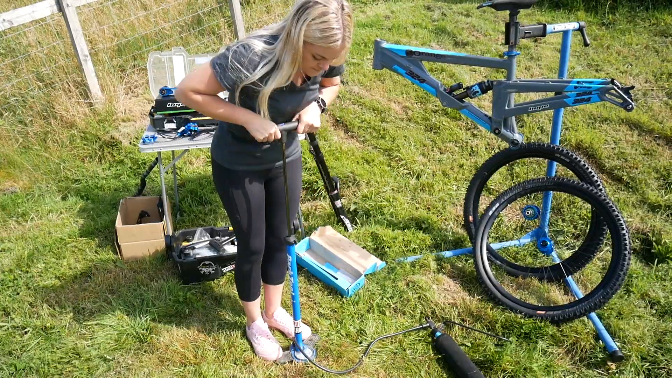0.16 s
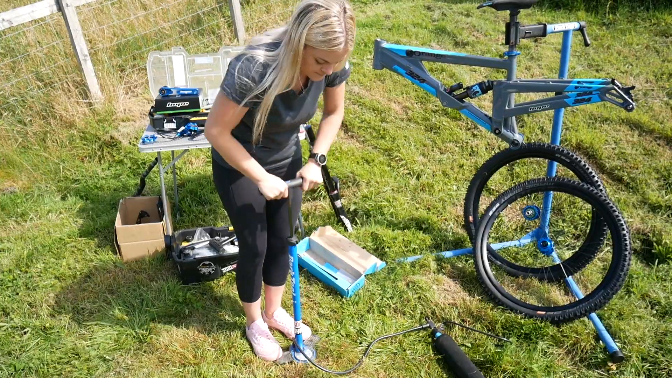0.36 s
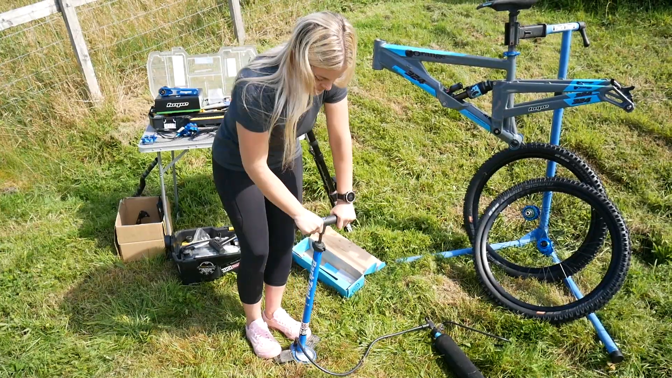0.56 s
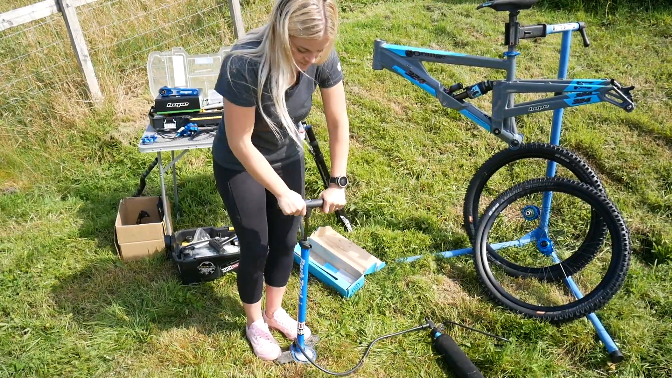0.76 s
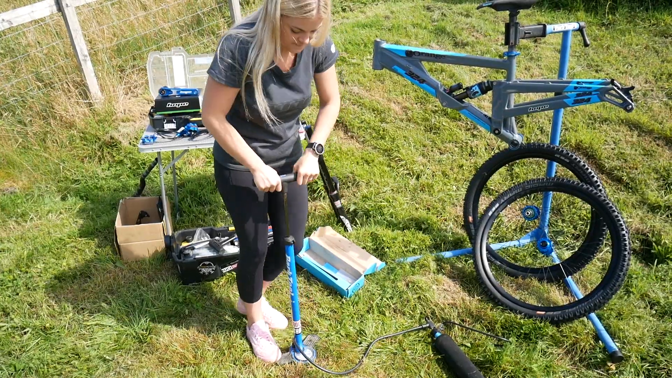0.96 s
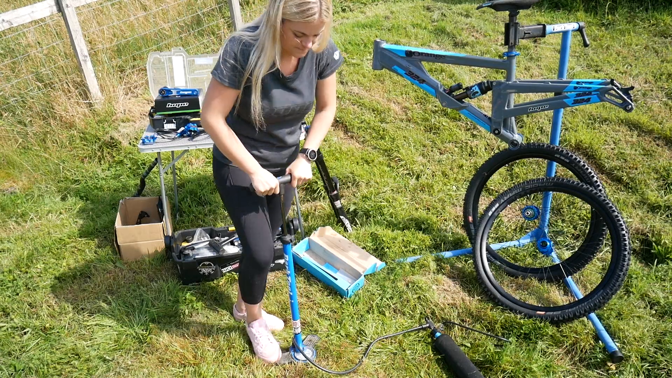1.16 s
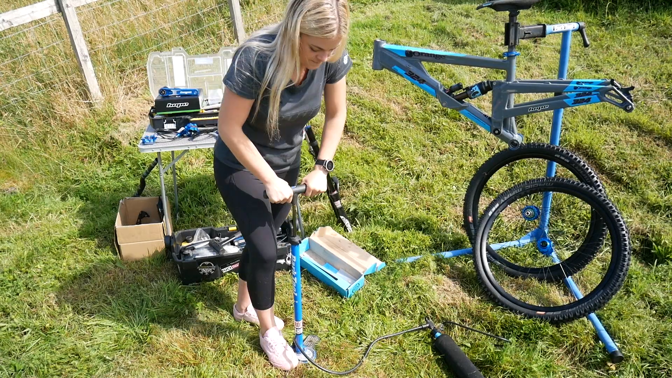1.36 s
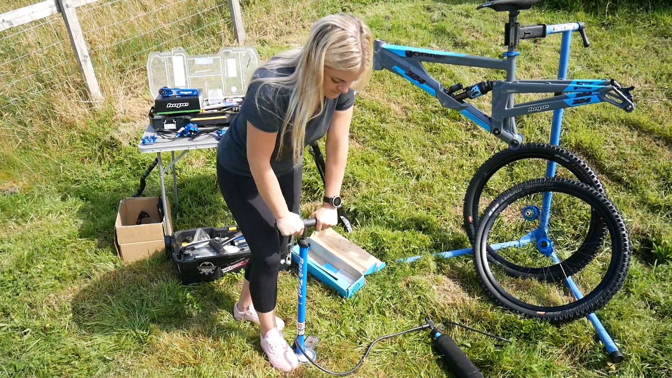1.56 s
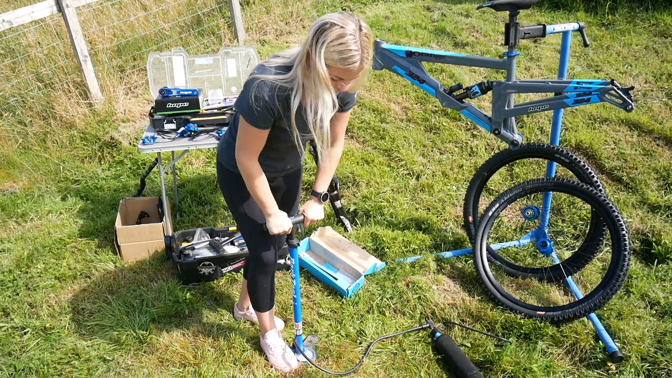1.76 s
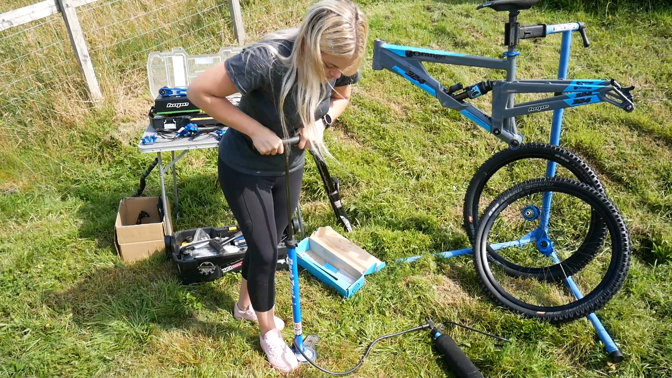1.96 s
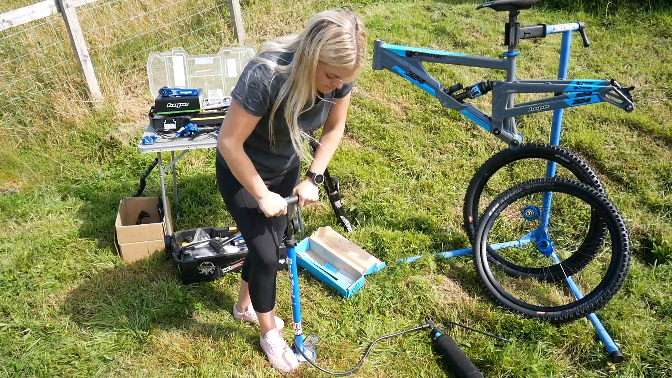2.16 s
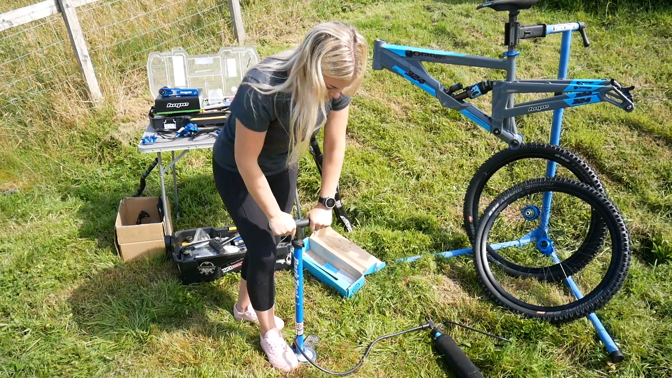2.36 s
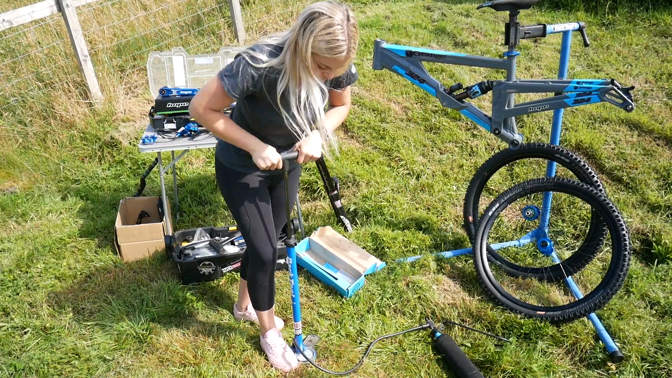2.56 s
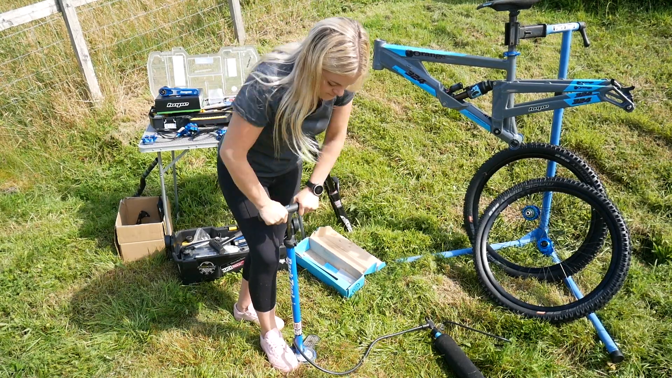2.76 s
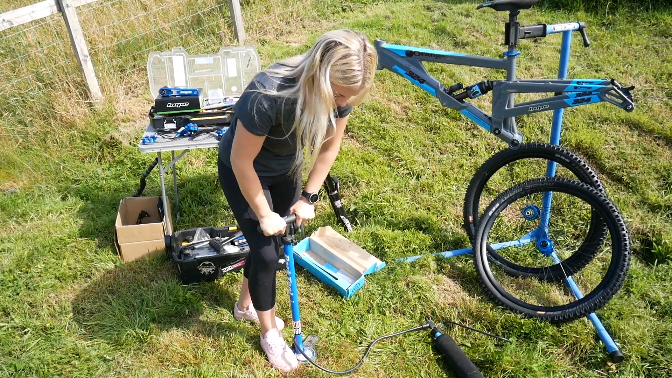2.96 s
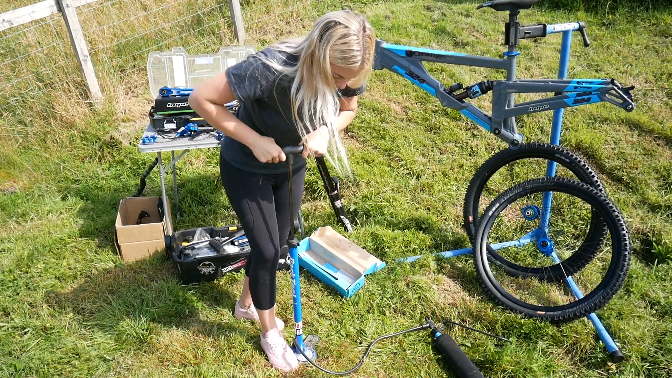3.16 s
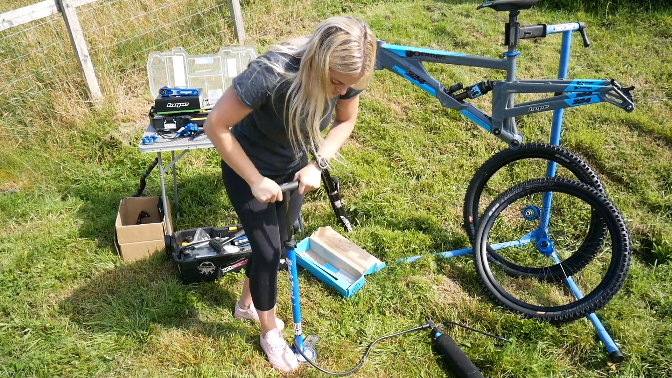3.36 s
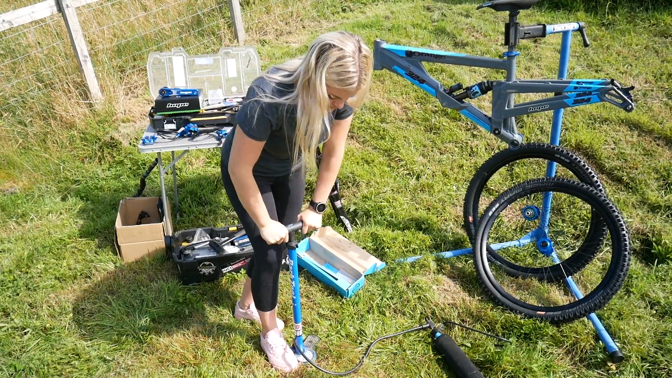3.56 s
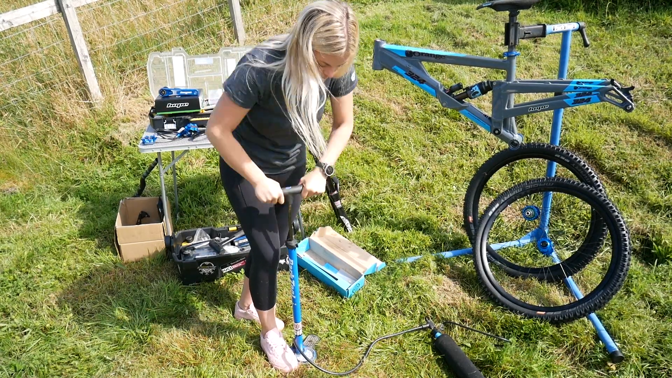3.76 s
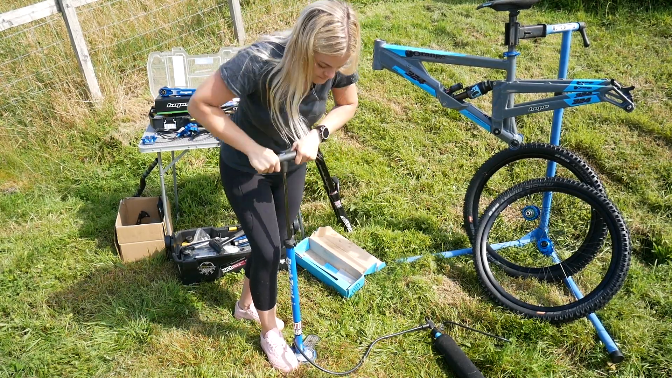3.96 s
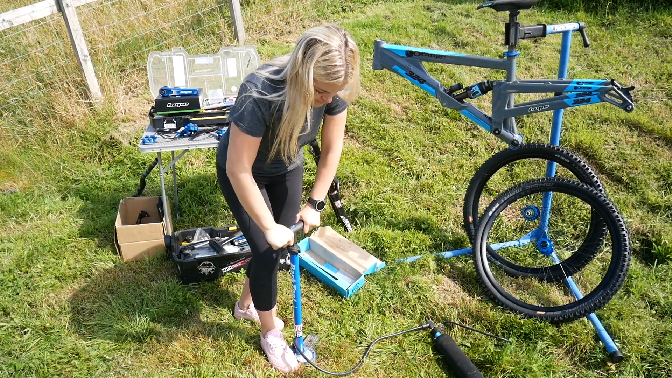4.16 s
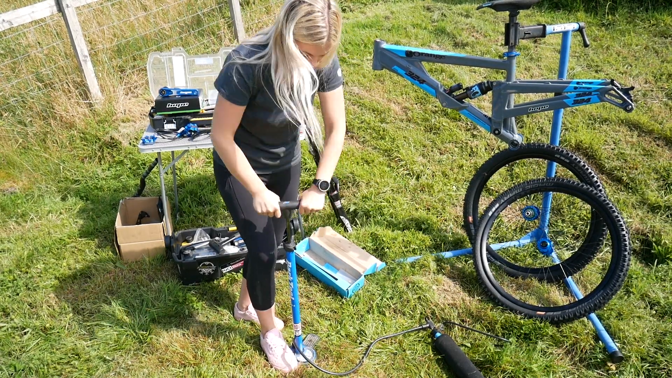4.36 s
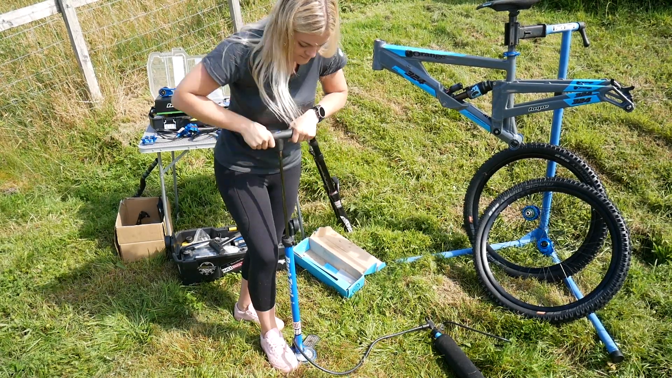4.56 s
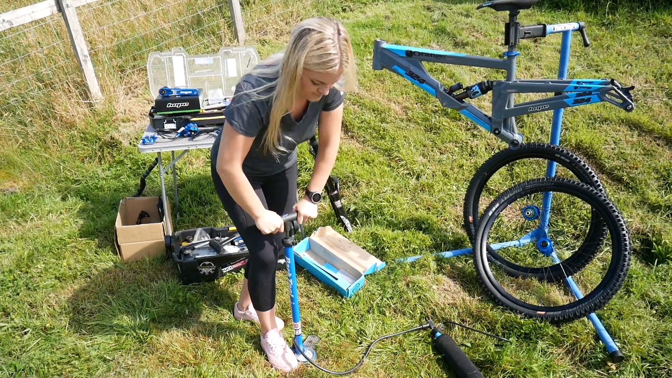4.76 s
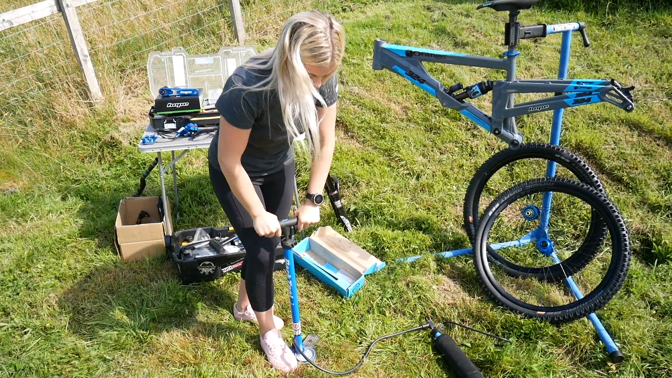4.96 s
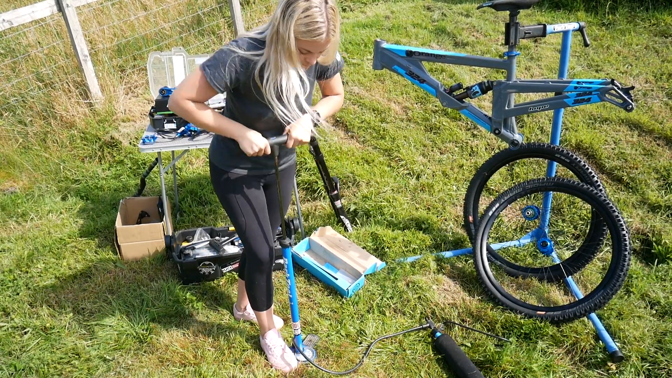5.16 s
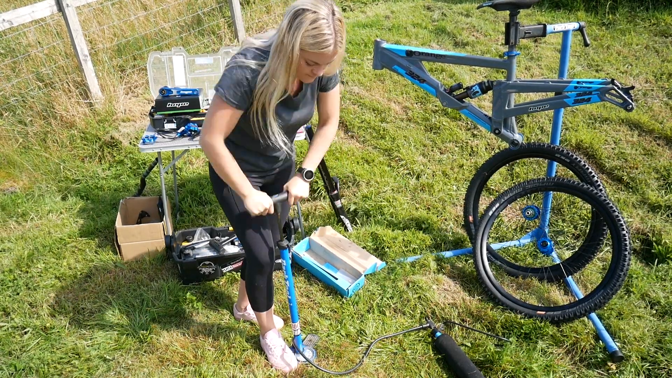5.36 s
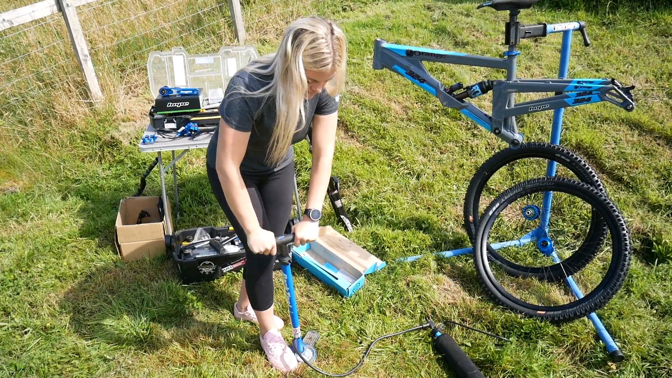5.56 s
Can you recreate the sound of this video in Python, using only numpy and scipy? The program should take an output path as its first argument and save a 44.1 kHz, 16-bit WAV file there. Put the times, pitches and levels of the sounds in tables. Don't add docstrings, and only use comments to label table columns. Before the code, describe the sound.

Eight brisk pump strokes on a lawn, airy hiss and brief reedy squeaks, soft rubbing pulls between, faint low field rumble behind.

```python
import sys
import numpy as np
from scipy import signal
from scipy.fft import rfft, irfft, next_fast_len
from scipy.io import wavfile
from scipy.ndimage import uniform_filter1d, map_coordinates

SR = 44100
rng = np.random.default_rng(int(sys.argv[2]) if len(sys.argv) > 2 else 0)


def gain_from_db(level_db):
    decades = np.asarray(level_db, float) / 20
    return 10 ** decades


def waveform_to_disk(signal):
    frames = np.transpose(np.atleast_2d(signal))
    scaled = np.clip(frames, -1, 1) * 32767
    samples = np.round(scaled).astype(np.int16)
    wavfile.write(sys.argv[1], SR, samples)


N = 247401

# start_s, pitch_hz, level_db
SQUEAKS = [
    [(0.4685, 2260, -18), (0.485, 2185, -18.5), (0.535, 2100, -22.5)],
    [(1.547, 2080, -21.5), (1.575, 2090, -19.5), (1.62, 1997, -21.5), (1.648, 2047, -24.5)],
    [(2.2075, 2092, -21.5), (2.225, 2024, -15.5), (2.245, 1963, -19), (2.307, 1817, -34),
     (2.318, 1977, -24), (2.338, 1930, -27)],
    [(2.7935, 1937, -17), (2.827, 1903, -21.5), (2.837, 2150, -13), (2.87, 2074, -14), (2.905, 2145, -16),
     (2.918, 1978, -22)],
    [(3.439, 1828, -21), (3.467, 1953, -21.5), (3.475, 1810, -26.5), (3.486, 2020, -23)],
    [(4.077, 2096, -16.5), (4.103, 1791, -30), (4.119, 2032, -21), (4.16, 1951, -20), (4.205, 2004, -21.5),
     (4.213, 1932, -23)],
    [(4.743, 1860, -19), (4.755, 1970, -16.5), (4.772, 1815, -21), (4.785, 1895, -24), (4.797, 1948, -22.5)],
    [(5.422, 2030, -10), (5.437, 1857, -21.5), (5.48, 1797, -26.5), (5.51, 1839, -25), (5.52, 1844, -39),
     (5.55, 1790, -34)],
]
# jolt_db under the flap, octave_trim_db, octave_drift_db_per_s,
# closing_slowness (ratio), closing_slide (exponent)
FLAPS = [(-23, 6.5, -150, 0.83, 0.28), (-31, 0.5, -23, 0.6, 0.55), (-32.5, 0.5, -19, .8, 0.84),
         (-22, 1, -32.5, .9, 2.4), (-15, -0.5, 63, 0.64, .6), (-18, 0, -12, 1.3, 1.6),
         (-23, 0.5, -7, .7, 1.4), (-31, -4.5, 57, 1.2, 0.52)]
# freq_hz, left_right_likeness (-1 to 1)
AIR_ALIKE = [(1000, 0.34), (2500, 0.99), (5000, 0.91), (8000, 0.37), (12000, .55)]


def unit(x):
    return x / np.sqrt(np.mean(x ** 2) + 1e-20)


def along(points, hz):
    f, v = np.transpose(points)
    return np.interp(np.log(hz + 1), np.log(f + 1), v)


def wobble(rate, size=N):
    knots = rng.standard_normal(int(size * rate / SR) + 4)
    return map_coordinates(knots, [np.arange(size) * rate / SR])


def sine(turns):
    return np.sin(2 * np.pi * turns)


def filtered(x, response):
    m = next_fast_len(N + SR // 2)
    return irfft(rfft(x, m) * response(np.fft.rfftfreq(m, 1 / SR)), m)[..., :N]


def rush(spectrum, alike, patchy_db):
    z = signal.stft(rng.standard_normal((2, N)), nperseg=512)[2]
    patches = rng.standard_normal(z.shape[1:])
    patches = uniform_filter1d(uniform_filter1d(patches, 3, 0), 8, 1)
    pair = signal.istft(z * gain_from_db(patchy_db * unit(patches)), nperseg=512)[1][:, :N]

    def mid_side(hz):
        angle = np.arccos(np.clip(along(alike, hz), -1, 1)) / 2
        return gain_from_db(along(spectrum, hz)) * [np.cos(angle), np.sin(angle)]

    mid, side = filtered(pair, mid_side)
    return unit(np.array([mid + side, mid - side]))


def valve():
    # multiple (ratio), level_db
    overtones = [(3, -4), (4, 2.5), (5, -9), (6, -12), (7, -23)]
    # whistle_db of the shrinking air column, overtone_db, tilt_db per multiple, beat_db
    voices = [(-24.5, -62, -37, -6), (-59, -47, -1, 11), (-27.5, -47, -2, 14), (-28, -41, 1, -5.5),
              (-46.5, -48.5, 2.5, -12), (-26, -46, 0, 2.5), (-24, -45, -1, 2.5), (-46, -47.5, 1, -4)]
    second_hz = [2450, 2430, 2350, 2400, 2420, 2300, 2380, 2330]
    sweep_pace = [.8, 1.3, 1.25, 1.3, 1.1, 1.2, 1.1, 1.1]
    # freq_hz, level_db per Hz
    chatter = [(1200, -34), (1700, -11.5), (2300, 16.5), (3000, -6.5), (3700, 2), (5000, -9), (9000, -29)]

    out = np.zeros(N + SR)
    rattle = rush(chatter, AIR_ALIKE, patchy_db=1.5)[0] * gain_from_db(4.4 * wobble(350))
    for rows, voice, mode_hz, habit, pace in zip(SQUEAKS, voices, second_hz, FLAPS, sweep_pace):
        whistle_db, over_db, tilt_db, beat_db = voice
        start = round(rows[0][0] * SR)
        t, hz, flap, mode, octave, half = flap_motion(rows, *habit)
        size = len(t)
        fight = np.clip(mode / flap, 0, 1)
        turns = np.cumsum(hz + (4 + 150 * fight ** 2) * wobble(394, size)) / SR
        second = np.cumsum(mode_hz + 30 * wobble(300, size)) / SR

        def flutter(depth):
            return 1 + np.tanh((depth + 0.79 * fight ** 1.01) * wobble(360, size))

        x = flap * flutter(0.015) * sine(turns)
        x += mode * (1 + 0.34 * np.tanh(wobble(200, size))) * sine(second)
        x += 0.5 * mode * rattle[start:][:size]
        x += half * (sine(turns / 2) + 1.41 * sine(1.5 * turns) + 0.59 * sine(2.5 * turns))
        x += octave * flutter(0.39) * sine(2 * turns)

        settled = np.clip(octave / gain_from_db(-35), 0, 1) * (1 - 1.6 * fight)
        for k, db in overtones:
            x += settled * gain_from_db(over_db + db + tilt_db * (k - 3.5)) * flutter(0.4) * sine(k * turns)

        x += gain_from_db(beat_db) * flap * mode * sine(second - turns)
        x += flap * mode * sine(second + turns)

        climb = np.exp(np.minimum(7.1 * pace * t + 60 * (pace * t) ** 2, 2))
        sweep = np.cumsum(2330 * climb + 60 * wobble(300, size)) / SR
        whistle = gain_from_db(whistle_db - 610 * t) * np.clip((t - 0.006) / 0.0018, 0, 1)
        x += whistle * flutter(0.22) * sine(sweep)

        fade_in = 1 - np.exp(-(t / 0.002) ** 2)
        fade_out = np.clip((t[-1] - t) / 0.0036, 0, 1)
        out[start:][:size] += np.sqrt(2) * x * fade_in * fade_out
    return out[:N]


def flap_motion(rows, jolt_db, trim_db, drift_db, slowness, slide):
    # middle_s, half_length_s, mode_db, half_pitch_db
    fights = [(1.638, 0.013, -35.5, -70), (2.325, 0.015, -32.5, -70), (2.824, .011, -32, -52),
              (3.456, .012, -35.5, -67), (3.481, 0.0078, -30, -65), (4.108, 0.0088, -31.5, -62),
              (4.138, 0.0035, -35.5, -63), (4.158, 0.029, -56, -57.5), (4.757, 0.0072, -39.5, -66),
              (4.789, 0.016, -29.5, -46), (5.439, .005, -27.5, -44), (5.454, 0.00494, -29, -45),
              (5.475, .006, -35, -45), (5.493, 0.0077, -35.5, -45), (5.505, 0.0068, -45, -44),
              (5.537, .022, -65, -63)]
    # pitch_hz, octave_db over the flap
    octave_curve = [(1800, -8), (1950, -16), (2050, -21.5), (2150, -26.5), (2350, -31)]
    # lag_s after the last point, pitch_ratio, loss_db
    closing = [(0.009, 0.97, -28), (0.033, 0.93, -28.5)]
    open_hz, open_s = 2351, 0.003895
    kick_s, idle_db = 0.0091, -47.5
    seating_s, linger_s = 0.0088, 0.016

    last_s, last_hz, last_db = rows[-1]
    path = list(rows)
    for lag, ratio, loss in closing:
        path.append((last_s + lag * slowness, last_hz * ratio ** slide, last_db + loss))
    s, hz, db = np.transpose(path)
    t = np.arange(round((s[-1] - s[0]) * SR)) / SR
    clock = t + s[0]
    flap = np.interp(clock, s, gain_from_db(db))
    hz = np.interp(clock, s, hz)
    hz = hz + (open_hz - hz) * np.exp(-t / open_s)

    mode = flap * (gain_from_db(jolt_db) * np.exp(-t / kick_s) + gain_from_db(idle_db))
    half = flap * gain_from_db(-53.5)
    for middle, width, mode_db, half_db in fights:
        grip = np.exp(-((clock - middle) / width) ** 4)
        mode = mode + grip * gain_from_db(mode_db)
        half = half + grip * gain_from_db(half_db)

    octave = uniform_filter1d(flap, int(linger_s * SR) + 1)
    octave = octave * gain_from_db(along(octave_curve, hz) + trim_db + drift_db * t)
    octave = octave * (1 - np.exp(-t / seating_s))
    return t, hz, flap, mode, octave, half


def air():
    # freq_hz, level_db per Hz
    hiss_colour = [(1470, -25), (2500, -16), (2740, -3), (5020, -3), (5880, -4), (7500, 5), (10400, -6),
                   (11900, -8), (14500, -15.5), (15300, -20)]
    rub_colour = [(650, -52.5), (1100, -55), (1290, -6.5), (1480, -16.5), (2040, -5), (2210, 0),
                  (2590, -1.5), (3590, -5.5), (4940, -9), (6500, -17), (8450, -29.5), (14300, -120)]
    barrel_colour = [(400, -13.5), (700, -3), (1000, 0.5), (1400, -4.5), (2200, -5), (3500, -34.5)]
    bright_hz, bright_db, bright_law = 9500, -44, 0.16

    hissing, rubbing, booming = effort()
    hiss = hissing * gain_from_db(1 + 0.8 * wobble(40)) * rush(hiss_colour, AIR_ALIKE, patchy_db=2.1)
    top = filtered(hiss, lambda hz: 1 / (1 + (bright_hz / (hz + 1)) ** 6))
    hiss = hiss + ((hissing / gain_from_db(bright_db)) ** bright_law - 1) * top
    rub = rubbing * gain_from_db(7 + 1.23 * wobble(50)) * rush(rub_colour, AIR_ALIKE, patchy_db=3)
    barrel = booming * gain_from_db(6.5 + 0.38 * wobble(48)) * rush(barrel_colour, AIR_ALIKE, patchy_db=3)
    return hiss + rub + barrel + booming * gain_from_db(3.5) * column() + intake()


def effort():
    # start_s, full_pressure_s, let_off_s, hiss_db, barrel_db
    pushes = [(0.214, 0.323, 0.55, -48.5, -59), (1.4, 1.45, 1.71, -61.5, -99),
              (2.062, 2.122, 2.334, -45.5, -58), (2.66, 2.725, 2.91, -44.5, -55.5),
              (3.295, 3.359, 3.56, -45, -56.5), (3.948, 3.998, 4.198, -45.5, -57),
              (4.61, 4.674, 4.85, -44, -55.5), (5.277, 5.332, 5.46, -44.5, -54)]
    # middle_s, half_length_s, hiss_db, rub_db
    pulls = [(0.071, 0.12, -59, -63.5), (0.98, 0.36, -68.5, -73.5), (1.906, .13, -63.5, -65.5),
             (2.552, .12, -61.5, -67.5), (3.154, .13, -61.5, -63.5), (3.823, .11, -62, -66),
             (4.5, 0.17, -62, -66.5), (5.119, .13, -59.5, -66)]
    # hiss_db, rub_db, barrel_db
    rest_db = (-94.5, -74.5, -77)
    climb_db, hiss_sag_db, let_off_db_per_s = 27.5, 8.5, 208
    low_lag = 1.24
    boom_s, boom_sag_db, boom_end_db = 0.084, 11.5, 12.5
    rub_early_db, rub_late_db = -18, -17.5
    jet_db, jet_rub_db, jet_s = -13.5, -20.5, 0.037
    pull_edge_db, pull_boom_db = 15.5, -7
    step = 32

    t = np.arange(0, N, step) / SR
    gains = gain_from_db(rest_db)[:, None] * np.ones(len(t))
    for start, full, off, hiss_db, boom_db in pushes:
        missing = np.clip((full - t) / (full - start), 0, 4) * [[1], [low_lag], [low_lag]]
        gate_db = -climb_db * missing - let_off_db_per_s * np.clip(t - off, 0, 1)
        down = np.clip((t - full) / (off - full), 0, 1)
        push_hiss = hiss_db - hiss_sag_db * down
        push_rub = hiss_db + rub_early_db + (rub_late_db - rub_early_db) * down
        sag_times = [full, full + boom_s, off + 0.00975]
        push_boom = boom_db - np.interp(t, sag_times, [0, boom_sag_db, boom_end_db])
        gains += gain_from_db(gate_db + [push_hiss, push_rub, push_boom])

    for middle, width, hiss_db, rub_db in pulls:
        level_db = np.array([[hiss_db], [rub_db], [hiss_db + pull_boom_db]])
        edge = np.clip((t - middle) / width, -4, 4) ** 2 * [[1.1], [0.9], [0.9]]
        gains += gain_from_db(level_db - pull_edge_db * edge)
    gains = np.repeat(gains, step, axis=1)[:, :N]

    jet = np.zeros(N + SR)
    for rows, habit in zip(SQUEAKS, FLAPS):
        octave = flap_motion(rows, *habit)[4]
        jet[round(rows[0][0] * SR):][:len(octave)] = octave
    gains[:2] += uniform_filter1d(jet[:N], int(jet_s * SR) + 1) * gain_from_db([[jet_db], [jet_rub_db]])
    return gains


def column():
    out = np.zeros(N)
    t = np.arange(-round(0.15 * SR), 0) / SR

    def breathy(hz, width_hz):
        return wobble(width_hz, len(t)) * sine(np.cumsum(hz) / SR)

    for rows in SQUEAKS:
        low = breathy(1900 * np.exp(9 * t), 352) + 0.5 * breathy(3800 * np.exp(9 * t), 504)
        high = 0.6 * breathy(9000 * np.exp(2.3 * t), 889)
        start = round(rows[0][0] * SR) - len(t)
        out[start:][:len(t)] = (low + high) * np.hanning(len(t))
    return out


def intake():
    # middle_s, level_db, half_length_s
    puffs = [(0.075, -54.5, 0.04), (1.927, -50, 0.025), (2.573, -47, 0.034), (3.131, -49, 0.027),
             (3.838, -49, 0.0278), (4.491, -56, 0.043), (5.13, -51, 0.04)]
    # centre_hz, width_hz, level_db
    resonances = [(1296, 39, -8), (2070, 180, -3.5), (2598, 55, 1.5)]
    t = np.arange(N) / SR
    swell = sum(gain_from_db(db) * np.exp(-((t - s) / half) ** 2) for s, db, half in puffs)

    def inlet(f):
        return sum(gain_from_db(db) * 1j * f * w / (c * c - f * f + 1j * f * w) for c, w, db in resonances)

    return swell * unit(filtered(rng.standard_normal(N), inlet))


def knocks():
    # pitch_hz, level_db, t60_s
    plate = [(192, -16.5, 0.039), (379, 2, 0.015), (747, -8, 0.016)]
    # start_s, plate_db, dull_tick_db, sharp_tick_db
    stamps = [(1.361, -30, -29, -36), (1.647, -25, -21, -38), (4.872, -22, -25, -28)]
    # start_s, thud_db, tick_db
    stops = [(2.444, -53, -47), (3.016, -43.5, -49), (3.7, -42.5, -43), (4.339, -57.5, -51),
             (4.606, -60, -57), (4.988, -40, -41.5)]
    # start_s, thud_db, tick_db, tick_hz
    taps = [(0.104, -53, -32, 3250), (0.121, -58, -42, 3420), (0.445, -59, -48, 2700),
            (.551, -45.5, -28.5, 1480), (.55, -62, -42.5, 7100), (.753, -51.5, -66, 3500),
            (0.995, -59, -46, 2400), (1.344, -55, -38.5, 2660), (1.526, -53.5, -42, 2400),
            (1.536, -57, -40, 2500), (2.366, -65, -64, 4500), (4.927, -48, -48, 1510)]

    thuds, ticks = [], []
    for s, plate_db, dull_db, sharp_db in stamps:
        thuds += [(s, plate_db + level, hz, t60) for hz, level, t60 in plate]
        ticks += [(s, dull_db, 750), (s, sharp_db, 2100)]
    for s, thud_db, tick_db in stops:
        thuds.append((s, thud_db, 329, 0.065))
        ticks.append((s, tick_db, 2970))
    for s, thud_db, tick_db, tick_hz in taps:
        thuds.append((s, thud_db, 410, 0.029))
        ticks.append((s, tick_db, tick_hz))

    out = np.zeros(N + SR)
    t = np.arange(SR // 5) / SR
    for s, db, hz, t60 in thuds:
        envelope = gain_from_db(db - 60 * t / t60) * (1 - np.exp(-t / 0.0029))
        out[round(s * SR):][:len(t)] += envelope * 3.75 * sine(hz * t)
    for s, db, hz in ticks:
        band = signal.butter(2, [hz * 0.65, hz * 1.4], "band", fs=SR)
        noise = signal.lfilter(*band, rng.standard_normal(len(t)))
        out[round(s * SR):][:len(t)] += noise * gain_from_db(db + 5.5 - 60 * t / 0.03)
    low_cut = signal.butter(2, 110, "high", fs=SR)
    return signal.lfilter(*low_cut, out[:N])


def scrapes():
    # start_s, decay_s, level_db
    contacts = [(.55, .006, -20), (3.51, .08, -30), (4.81, .06, -27), (1.65, .01, -34), (2.34, .04, -35),
                (4.22, .03, -33)]
    t = np.arange(N) / SR
    grip = sum(gain_from_db(db) * (t > s) * np.exp(-np.abs(t - s) / length) for s, length, db in contacts)
    return rng.standard_normal(N) * grip


def steel(x):
    # pitch_hz, level_db, t60_s
    modes = [(2130, -14, 0.2), (2570, -20, 0.21), (3240, -4, 0.26), (3860, -17.5, 0.26), (4365, -13, 0.44),
             (7230, -1.5, 0.18), (11250, -16, .3), (10360, -14.5, .3)]
    t = np.arange(SR // 2) / SR
    ring = sum(gain_from_db(db - 60 * t / t60) * sine(hz * t) for hz, db, t60 in modes)
    return signal.fftconvolve(x, ring)[:N] / SR * 60


def ports(x):
    # freq_hz, level_db
    right_lift = [(5000, 0), (8000, -2.5), (12000, 10)]
    # freq_hz, phase_rad
    port_phase = [(600, -0.52), (1550, 0.16), (3500, 0.25), (5170, 0.62), (6200, -1.08), (7840, -1),
                  (8530, -1.87), (13400, -0.42)]
    half = np.array([[0.5], [-0.5]])

    def hearing(hz):
        return gain_from_db(-along(right_lift, hz) * half) * np.exp(1j * half * along(port_phase, hz))

    return filtered(x, hearing)


def yard(x):
    # freq_hz, t60_s
    decay = [(300, .08), (2000, 0.14), (10000, 0.016)]
    hz, t, z = signal.stft(rng.standard_normal((2, SR // 3)), SR, nperseg=256)
    tail = signal.istft(z * gain_from_db(-60 * t / along(decay, hz)[:, None]), SR, nperseg=256)[1]
    delayed = np.pad(x, (500, 0))
    return signal.fftconvolve(delayed[None], tail / np.linalg.norm(tail[0]), axes=1)[:, :N]


def field():
    # freq_hz, level_db per Hz
    colour = [(15, -44), (25, -45), (75, -8.5), (173, 0), (245, 1), (578, -1.5), (842, -10), (1440, -17.5),
              (2670, -29.5), (4100, -34), (5970, -41.5), (10200, -30.5), (15300, -39.5)]
    # freq_hz, left_right_likeness (-1 to 1)
    alike = [(60, -0.73), (240, -0.49), (940, -0.89), (3740, -0.825), (14800, 0.099)]
    # pitch_hz, level_db
    machine = (227.5, -60.5)
    hum_hz, hum_db = machine
    hum = gain_from_db(hum_db + 1.1 * wobble(5.82)) * sine(np.cumsum(hum_hz + 2.43 * wobble(3.8)) / SR)
    rumble = gain_from_db(-52 + 0.7 * wobble(4.91)) * rush(colour, alike, patchy_db=3)
    return rumble * gain_from_db([[-0.8], [0.8]]) + hum * gain_from_db([[-0.9], [0.9]])


def scene():
    squeak, hits, flow = valve(), knocks(), air()
    tube = gain_from_db(-3) * steel(squeak) + gain_from_db(12) * steel(flow[0]) + gain_from_db(4) * steel(hits)
    pump = squeak + tube + steel(scrapes()) + hits * gain_from_db([[-1.4], [1.4]]) + flow
    return ports(pump) + gain_from_db(-27) * yard(squeak + hits) + field()


def top_cut(x):
    return signal.sosfilt(signal.butter(12, 15430, fs=SR, output="sos"), x)


def record(dry):
    start_s = 0.021
    mix = dry * (np.arange(N) > start_s * SR)
    return top_cut(mix)


dry = scene()
out = record(dry)
waveform_to_disk(out)
```